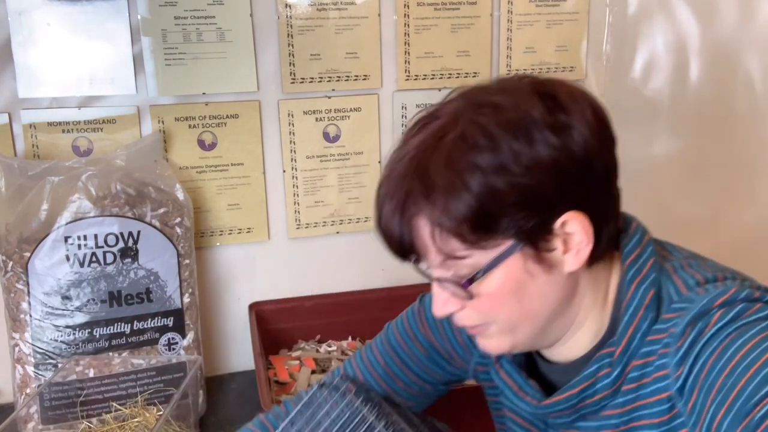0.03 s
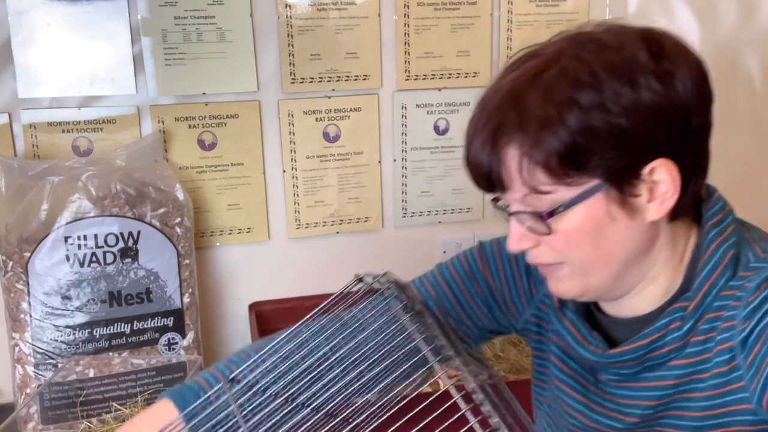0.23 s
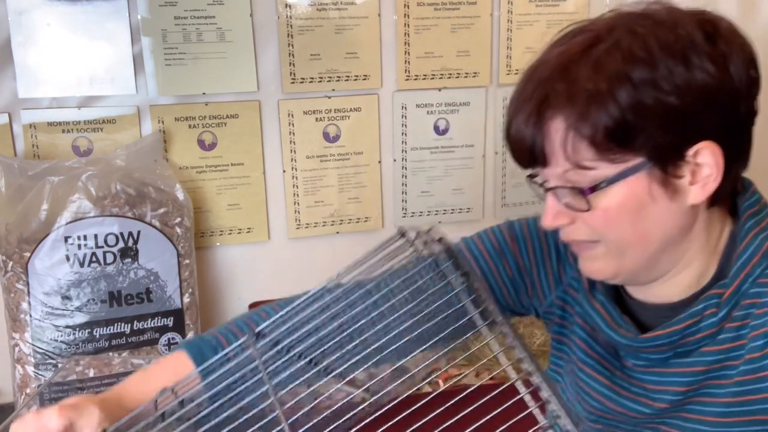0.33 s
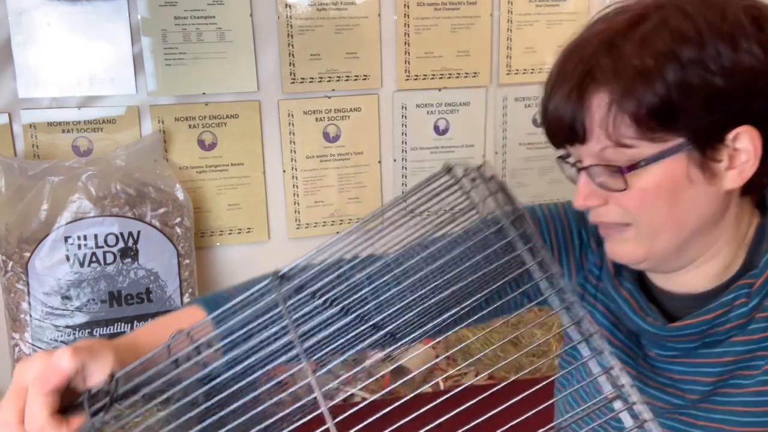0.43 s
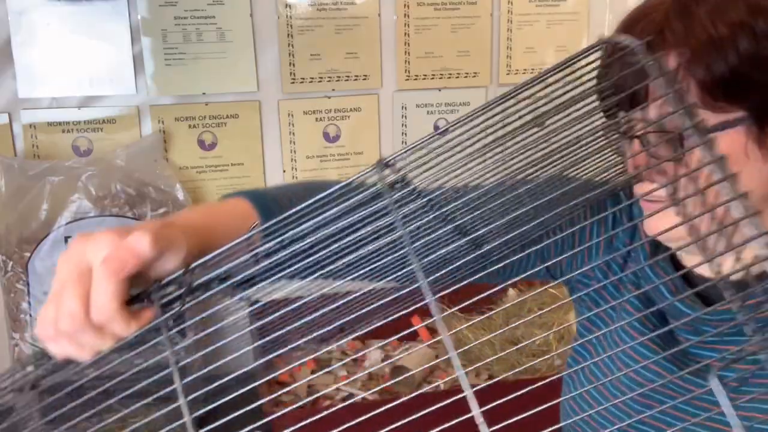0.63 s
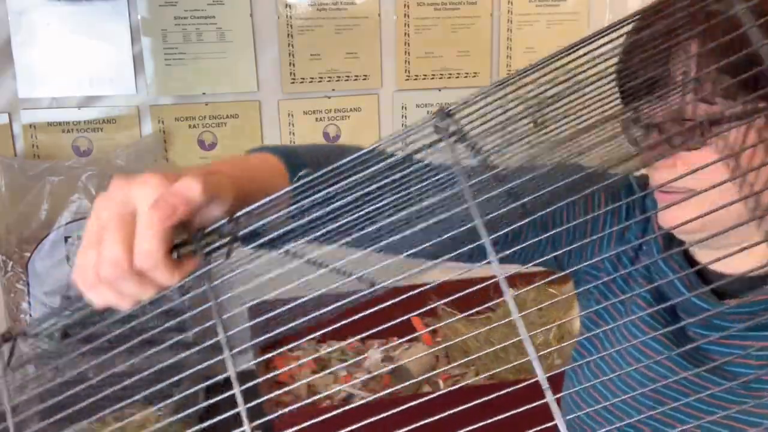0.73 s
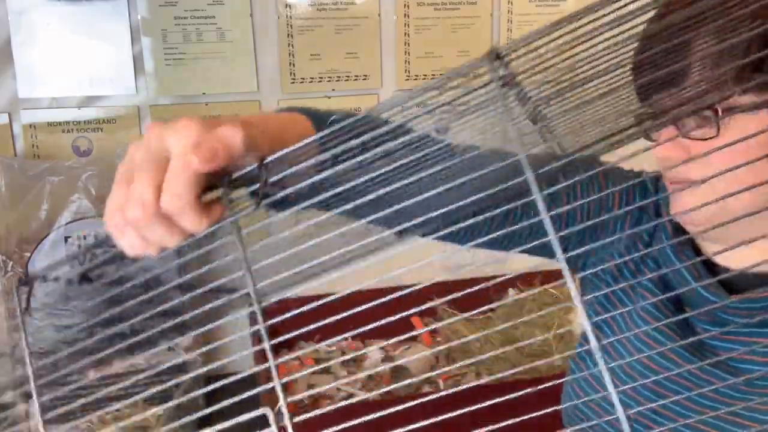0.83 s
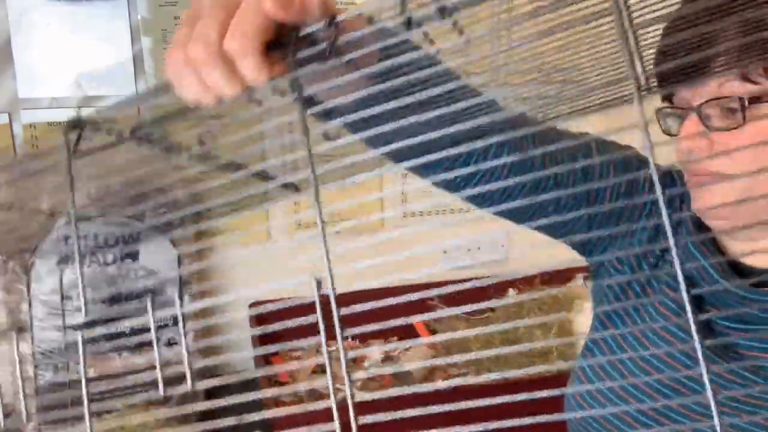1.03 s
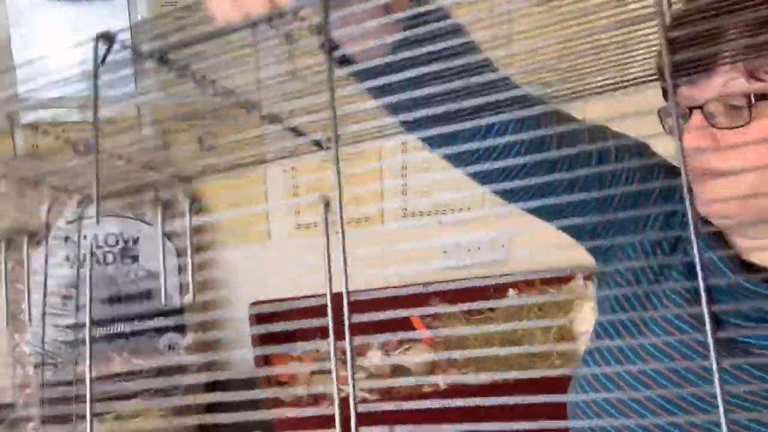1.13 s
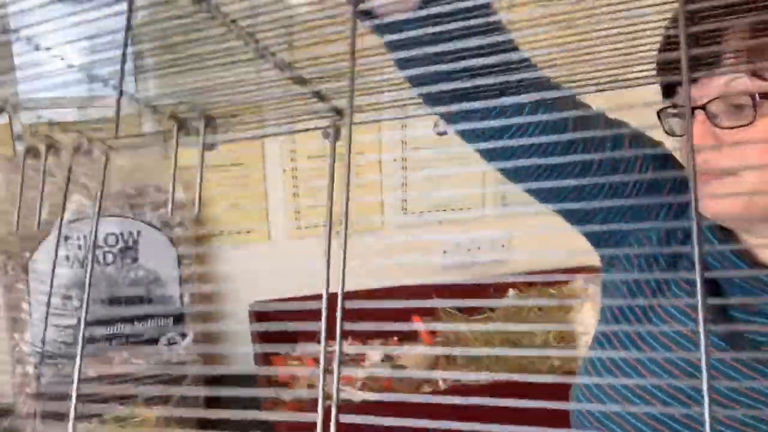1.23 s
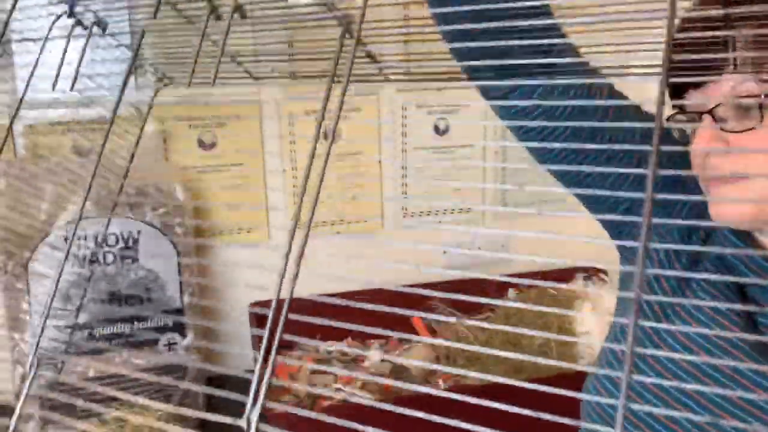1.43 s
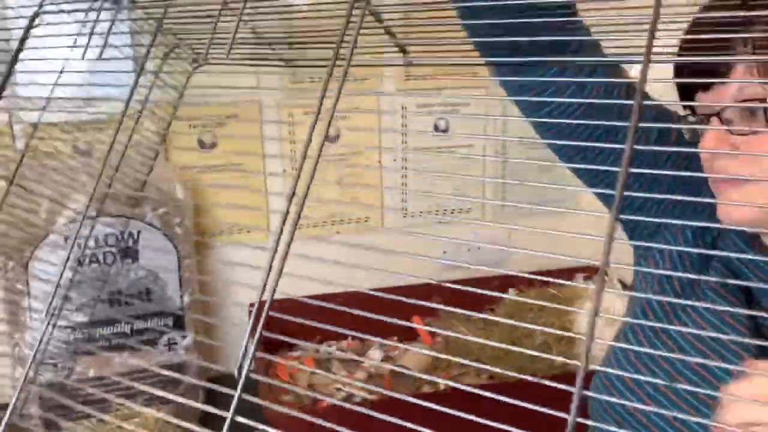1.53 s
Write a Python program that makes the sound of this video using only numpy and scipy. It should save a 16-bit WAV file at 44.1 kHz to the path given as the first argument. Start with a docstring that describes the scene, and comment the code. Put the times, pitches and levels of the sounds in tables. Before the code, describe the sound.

Close to the microphone in a small quiet room, a wire cage top gives one sharp clattering knock with a hollow plastic thud, rings briefly and shudders low, then light wire ticks and sleeve rustle follow.

```python
"""A wire cage top is lifted off its plastic tub in a small room, close to the microphone.
One knock of four contacts: wires clash (decaying noise, thin sines), the frame rings (decaying sines).
The tub thuds and the frame wobbles (slow sines); a deep noise shudder swells just after.
Faint noise swells sharply into the knock; light rattles (noise bands) and sleeve rustle (noise) follow.
Quiet air and rumble, both steady noise, run throughout."""
import sys
import numpy as np
from scipy import signal
from scipy.fft import rfft, irfft, next_fast_len
from scipy.io import wavfile
from scipy.ndimage import map_coordinates

SR = 44100
rng = np.random.default_rng(int(sys.argv[2]) if len(sys.argv) > 2 else 0)


def transcribe(u):
    """Save the signal u as a 16-bit wav file named by the first command-line argument.

    u: samples, shape (n,) or (channels, n), limited to [-1, 1]; the rate is SR.
    q: integer samples, one column per channel.
    """
    v = np.clip(np.atleast_2d(u).T, -1, 1)
    q = np.round(v * 32767).astype(np.int16)
    wavfile.write(sys.argv[1], SR, q)


N = 70560


def amp(db):
    """Decibels to gain."""
    return 10 ** (np.asarray(db) / 20)


def unit(x):
    """Scale to rms 1."""
    return x / np.sqrt(np.mean(x ** 2) + 1e-20)


def along(points, hz):
    """Interpolate (f/Hz, value) points on a log frequency axis."""
    f, v = np.transpose(points)
    return np.interp(np.log(hz + 1), np.log(f + 1), v)


def filtered(x, response):
    """Multiply the spectrum of x by response(hz)."""
    m = next_fast_len(N + SR // 2)
    return irfft(rfft(x, m) * response(np.fft.rfftfreq(m, 1 / SR)), m)[..., :N]


def since(start_s):
    """Seconds since start_s, zero before it."""
    return np.maximum(np.arange(N) / SR - start_s, 0)


def fade(t, t60_s):
    """Exponential decay, 60 dB in t60_s."""
    return np.exp(-np.log(1000) * t / t60_s)


def strike(start_s, t60_s, attack_s):
    """Blow envelope: exponential rise times exponential decay."""
    t = since(start_s)
    return fade(t, t60_s) * (1 - np.exp(-t / attack_s))


def sine(hz, start_s, phase=0):
    """Sine whose phase runs from start_s."""
    return np.sin(2 * np.pi * hz * since(start_s) + phase)


def wander(rate_hz):
    """Smooth random curve through rate_hz random points a second."""
    return map_coordinates(rng.standard_normal(N), [since(0) * rate_hz])


# left-right correlation: f/Hz, correlation
LIKENESS = [(50, 0.95), (300, 0.85), (700, .7), (2000, 0.19), (5000, .35), (7000, 1), (12000, 1)]


def noise(colour):
    """Coloured stereo noise, rms 1; mid and side shares set the correlation per frequency."""
    def mid_side(hz):
        turn = np.arccos(np.clip(along(LIKENESS, hz), 0, 1)) / 2
        return amp(along(colour, hz)) * [np.cos(turn), np.sin(turn)]

    mid, side = filtered(rng.standard_normal((2, N)), mid_side)
    return unit(np.array([mid + side, mid - side]))


def dying(x, start_s, t60s):
    """Start x at start_s; each frequency decays at its own speed."""
    hz, t, z = signal.stft(x, SR, nperseg=256)
    z = z * fade(np.maximum(t - start_s, 0), along(t60s, hz)[:, None])
    return signal.istft(z, SR, nperseg=256)[1][:, :N] * (since(start_s) > 0)


# room air colour: f/Hz, relative level/dB per Hz
AIR_COLOUR = [(53, -38), (90, -4), (228, -6.5), (329, -10.5), (456, -8.5), (1010, -12), (1130, -13),
              (1820, -18.5), (8620, -26.5), (15800, -18.5)]


def air(level_db=-73):
    """Steady noise of the room air."""
    return amp(level_db) * noise(AIR_COLOUR)


# rumble colour: f/Hz, relative level/dB per Hz
RUMBLE_COLOUR = [(12, -11), (28, 8.5), (55, 3.5), (100, -9), (200, -30.5), (600, -83.5)]


def rumble(level_db=-68.5):
    """Steady low noise."""
    return amp(level_db) * noise(RUMBLE_COLOUR)


# sleeve movement: t/s, rub level/dB, fizz level/dB (both before trim)
SLEEVE_LEVELS = [(.98, -100, -100), (1.04, -73.5, -73), (1.121, -69, -71), (1.169, -68.5, -79.5),
                 (1.25, -63.5, -75.5), (1.42, -65.5, -71.5), (1.48, -82, -74.5), (1.54, -99, -80),
                 (1.6, -96, -79.5)]
# dull cloth rub colour: f/Hz, relative level/dB per Hz
RUB_COLOUR = [(60, -36), (120, -10.5), (340, -4), (440, -5.5), (600, -1), (780, -7), (920, -1.5),
              (1150, -13), (1550, -9.5), (2200, -17.5), (4000, -27.5), (8000, -49)]
# bright cloth fizz colour: f/Hz, relative level/dB per Hz
FIZZ_COLOUR = [(1500, -19), (3500, -9), (7000, -6.5), (15000, -3.5)]


def sleeve(rub_trim_db=-2.5, fizz_trim_db=4, grain_db=2, grain_rate_hz=70):
    """Cloth rubs unevenly as the arm rises: two noise colours under one random grain."""
    s, rub_db, fizz_db = np.transpose(SLEEVE_LEVELS)
    rub_gain = np.interp(since(0), s, amp(rub_db + rub_trim_db), left=0)
    fizz_gain = np.interp(since(0), s, amp(fizz_db + fizz_trim_db), left=0)
    grain = amp(grain_db * wander(grain_rate_hz))
    return grain * (rub_gain * noise(RUB_COLOUR) + fizz_gain * noise(FIZZ_COLOUR))


# noise around the knock: t/s, level/dB
SWELL_LEVELS = [(0, -95), (.06, -73.5), (.17, -77), (.21, -44), (.3, -99.5)]
# its colour: f/Hz, relative level/dB per Hz
SWELL_COLOUR = [(100, 0), (450, -5.5), (1000, -9.5), (1800, -3), (2600, -17), (7000, -18.5), (15000, -41)]


def noise_swell():
    """Faint noise at first, swelling sharply into the knock and fading out under it by 0.3 s."""
    s, db = np.transpose(SWELL_LEVELS)
    return amp(np.interp(since(0), s, db)) * noise(SWELL_COLOUR)


# light wire touches: t/s, level/dB, centre f/Hz, width/octaves (centre to skirt), t60/s
TOUCHES = [(.437, -60.5, 10020, .7, 0.28), (.446, -51, 9650, 0.89, .25), (0.627, -71, 7300, 0.73, 0.27),
           (0.726, -68.5, 9300, 1.8, 0.16), (0.842, -68.5, 2100, .5, 0.097), (1.018, -73, 7560, 2.6, 0.45),
           (1.062, -52.5, 12900, .9, 0.022), (1.069, -55.5, 8300, .9, 0.027),
           (1.071, -64, 6300, 0.26, 0.17), (1.077, -60, 11100, 0.49, 0.18), (1.176, -68, 910, 0.22, 0.55),
           (1.397, -60.5, 596, 0.24, 0.14), (1.413, -67.5, 1630, 0.73, 0.18),
           (1.463, -74, 6500, 0.26, 0.115), (1.576, -71, 7700, 0.64, .3)]


def rattles(skirt_db=-9, far_db=-30, tick_db=3, tick_t60_s=0.0053):
    """Loose wires touch lightly; each touch ticks and rings in a noise band of its own."""
    out = np.zeros((2, N))
    for s, db, hz, width_oct, t60_s in TOUCHES:
        step = 2 ** width_oct
        band = [(hz / step ** 3, far_db), (hz / step, skirt_db), (hz, 0),
                (hz * step, skirt_db), (hz * step ** 3, far_db), (hz * step ** 6, 2 * far_db)]
        ring = strike(s, t60_s, 0.00098)
        tick = amp(tick_db) * strike(s, tick_t60_s, .0001)
        out += amp(db) * noise(band) * (ring + tick)
    return out


# shudder colour: f/Hz, relative level/dB per Hz
SHUDDER_COLOUR = [(20, -8.5), (60, 1), (90, -3), (160, -15.5), (300, -27), (700, -67)]


def shudder(start_s=.244, level_db=-35.5, swell_s=0.0079, t60_s=0.67):
    """Deep irregular shudder of the cage: low noise swells just after the knock."""
    return amp(level_db) * noise(SHUDDER_COLOUR) * strike(start_s, t60_s, swell_s)


# slow frame flexing: t/s, f/Hz, mid level/dB, swell/s, t60/s
FLEXES = [(0.237, 29.2, -29.5, 0.043, 0.43), (0.242, 56.67, -33.5, 0.0078, 0.83),
          (.243, 113.3, -36, .008, 0.37), (0.35, 60, -40, 0.0094, 0.41), (.48, 58.2, -48, 0.019, 0.25),
          (0.602, 48, -50, .01, 0.11), (.72, 59, -57, 0.019, 0.45)]


def wobble(unsteady_db=3, unsteady_rad=0.38, rate_hz=25):
    """The loose frame flexes unevenly in the hands: sines wandering in level and phase."""
    out = np.zeros(N)
    for s, hz, db, swell_s, t60_s in FLEXES:
        drift = wander(rate_hz)
        flex = sine(hz, s, unsteady_rad * drift)
        out += amp(db + unsteady_db * drift) * flex * strike(s, t60_s, swell_s)
    return out


# tub thuds: t/s, level/dB, f/Hz, t60/s
TUB_THUDS = [(.217, -13.5, 257.7, 0.072), (.246, -30.5, 151.1, 0.51)]


def tub():
    """The plastic tub gives short hollow thuds: decaying sines."""
    return sum(amp(db) * sine(hz, s) * strike(s, t60_s, .004) for s, db, hz, t60_s in TUB_THUDS)


# room decay: f/Hz, t60/s
ROOM_DECAY = [(100, .3), (1000, .28), (12000, .22)]


def room(x, level_db=-7.5):
    """Add to mono x the short answer of the room: convolution with a decaying stereo noise tail."""
    tail = dying(noise([(100, 0), (15000, 0)]), 0, ROOM_DECAY)
    tail = tail / np.linalg.norm(tail[0])
    return x + amp(level_db) * signal.fftconvolve(x[None], tail, axes=1)[:, :N]


def pings(count=60, spread_db=4, low_hz=1936, high_hz=15730):
    """Single wires ring at scattered high pitches, each with its own left-right phase, from t = 0."""
    t = since(0)[:SR // 2]
    out = np.zeros((2, N))
    for place, size, side in rng.random((count, 3)):
        hz = low_hz + place * (high_hz - low_hz)
        gain = amp(-spread_db * np.log(size + 1e-3).clip(-3, 0))
        phase = (side - .5) * np.array([[1], [-1]])
        out[:, :len(t)] += gain * np.sin(2 * np.pi * hz * t + phase)
    return out / np.sqrt(np.mean(out[:, :len(t)] ** 2))


# contacts: t/s, wire clash level/dB, frame ring level/dB
CONTACTS = [(0.2142, -24.5, -24.5), (.2235, -20, -34.5), (0.244, -37.5, -42), (0.289, -32, -46)]
# frame modes: f/Hz, level/dB re frame ring, t60/s
FRAME_MODES = [(228, -13, .28), (260, -3, .27), (322, -14, .3), (461, -10, .27), (657, -13, .3),
               (797, -7, .27), (1000, -3, .14), (1025, 4, .18), (1182, -7, .23), (1210, -7, .24),
               (1371, -8, .23), (1594, -1, .24), (1811, -6, .22), (2176, -9, .24), (2278, -10, .23),
               (2796, -6, .2)]
# dense wire modes, colour: f/Hz, relative level/dB per Hz
WIRE_COLOUR = [(50, -45), (130, -10.5), (280, 2.5), (400, -9.5), (600, -5.5), (900, -0.5), (1600, -1),
               (2400, -5), (3600, -12.5), (4700, -13), (6500, -11.5), (10000, -9.5), (15500, -15)]
# dense wire modes, decay: f/Hz, t60/s
WIRE_DECAY = [(200, .42), (700, 0.36), (1400, 0.19), (2500, .26), (7000, 0.23), (15000, 0.24)]
# lasting ring colour: f/Hz, relative level/dB per Hz
AFTER_COLOUR = [(100, -17), (300, -4), (900, -2.5), (1600, 0.5), (2100, -6.5), (4000, -7.5), (8000, -11.5),
                (15000, -18.5)]


def knock(crack_db=10, crack_t60_s=0.0062, after_db=-31.5, after_t60_s=1.25,
          ping_db=-11.5, ping_t60_s=0.27, chatter_db=1.5, chatter_rate_hz=130):
    """Each contact cracks, rings the frame modes and sets the wire mesh chattering."""
    mesh, ring = np.zeros((2, N)), np.zeros(N)
    ping = amp(ping_db) * pings() * strike(0, ping_t60_s, .0003)
    chatter = amp(chatter_db * wander(chatter_rate_hz))
    for s, clash_db, ring_db in CONTACTS:
        crack = noise([(800, -6.5), (6000, -3.5), (15000, -1.5)]) * strike(s, crack_t60_s, .0001)
        after = noise(AFTER_COLOUR) * strike(s, after_t60_s, 0.0071)
        wires = chatter * dying(noise(WIRE_COLOUR), s, WIRE_DECAY)
        wires += amp(crack_db) * crack + amp(after_db) * after
        wires += np.roll(ping, round(s * SR), axis=1)
        mesh += amp(clash_db) * wires
        for k, (hz, db, t60_s) in enumerate(FRAME_MODES):
            sign = (-1) ** k
            ring += sign * amp(ring_db + db) * sine(hz, s) * strike(s, t60_s, 0.00043)
    return mesh + room(ring)


def scene():
    """The cage, the noise swell and the sleeve, over quiet room air and rumble."""
    cage = knock() + tub() + wobble() + shudder() + rattles()
    soft_noises = noise_swell() + sleeve()
    background = air() + rumble()
    return cage + soft_noises + background


# phase by which the left port leads: f/Hz, lead/half turns
LEFT_LEAD = [(0, 0), (700, .08), (1600, .3), (2500, .75), (3400, 0), (4900, 1), (6600, 1.93), (7400, 2.07),
             (8650, 3), (10100, 4), (11650, 5), (13200, 6), (14650, 7), (16000, 8)]
# right port over left: f/Hz, gain/dB
RIGHT_OVER_LEFT = [(300, 1.05), (900, 0), (1700, 3), (3000, 3), (6000, 1.5), (15000, -1)]


def record(dry, top_hz=15900):
    """Two microphone ports differ in phase and gain, split evenly; band-limited below top_hz."""
    half = np.array([[.5], [-.5]])

    def port(hz):
        lead_rad = np.pi * np.interp(hz, *np.transpose(LEFT_LEAD))
        return np.exp(1j * half * lead_rad) * amp(-half * along(RIGHT_OVER_LEFT, hz))

    ports = filtered(dry, port)
    return filtered(ports, lambda hz: hz < top_hz)


dry = scene()
out = record(dry)
transcribe(out)
```